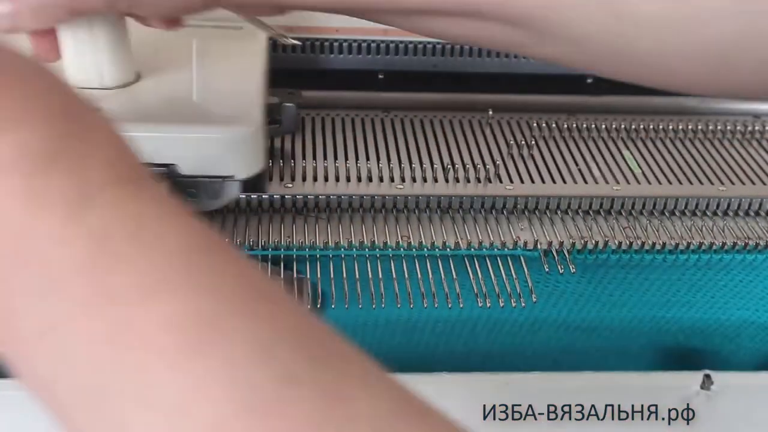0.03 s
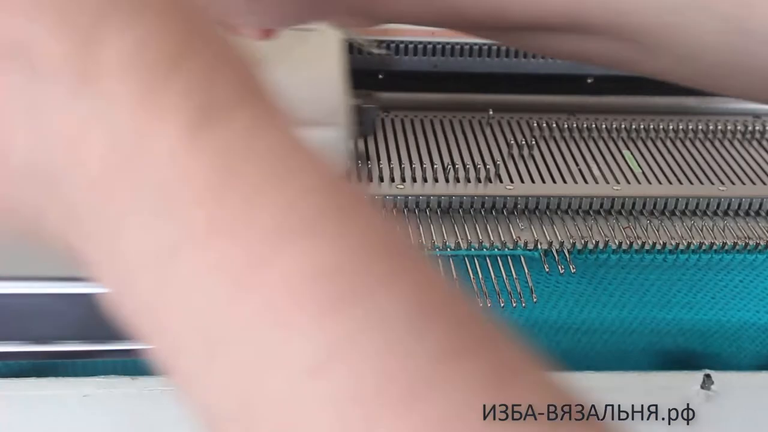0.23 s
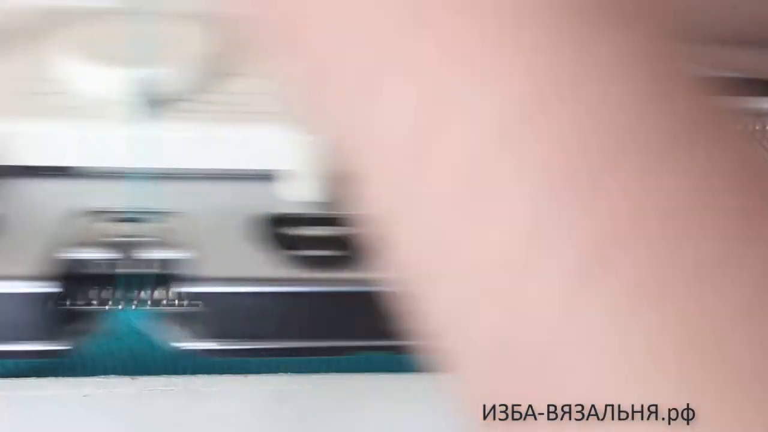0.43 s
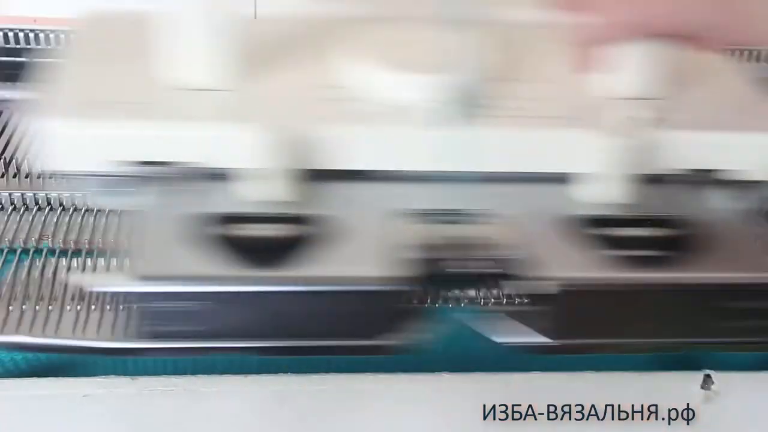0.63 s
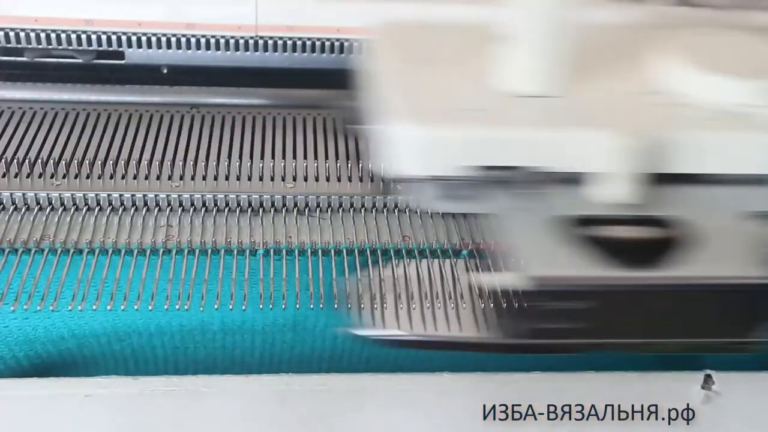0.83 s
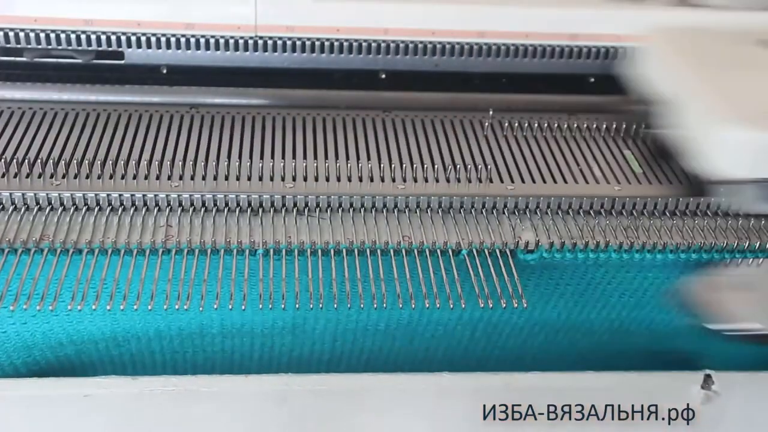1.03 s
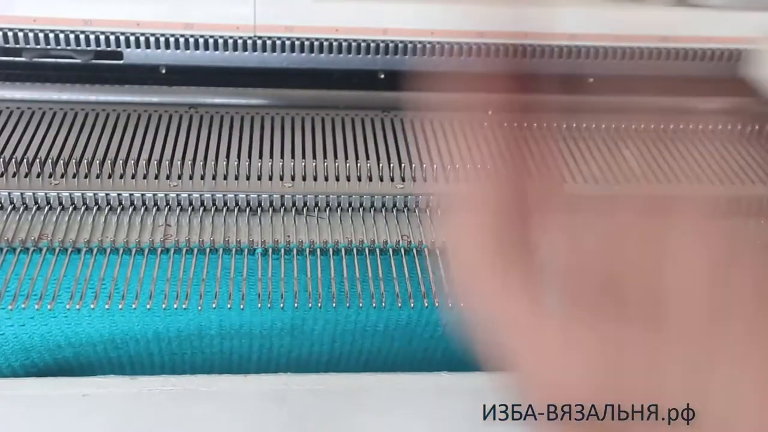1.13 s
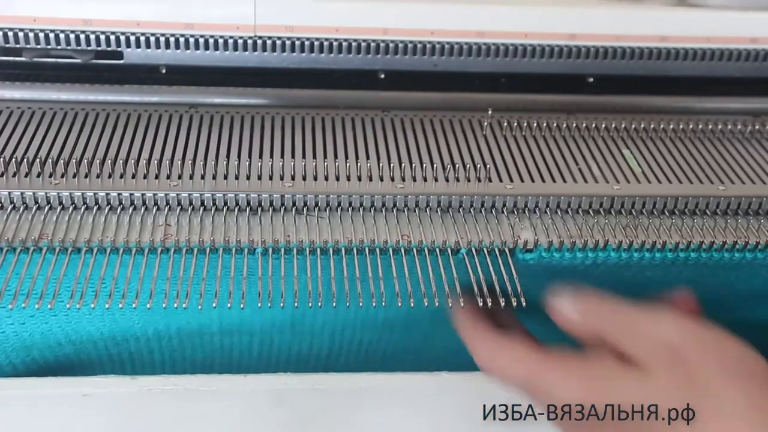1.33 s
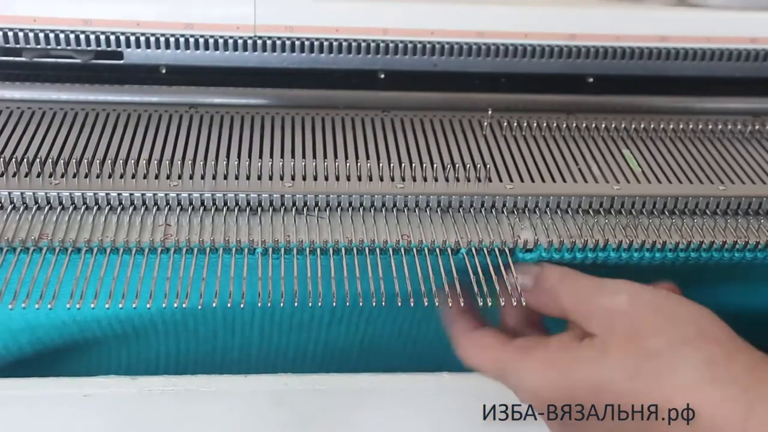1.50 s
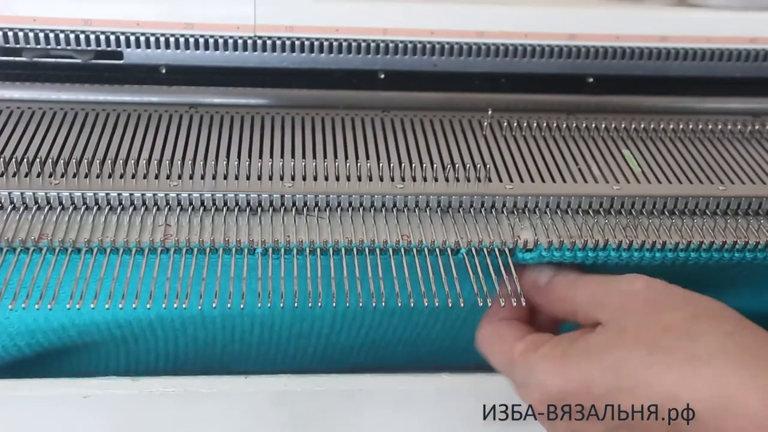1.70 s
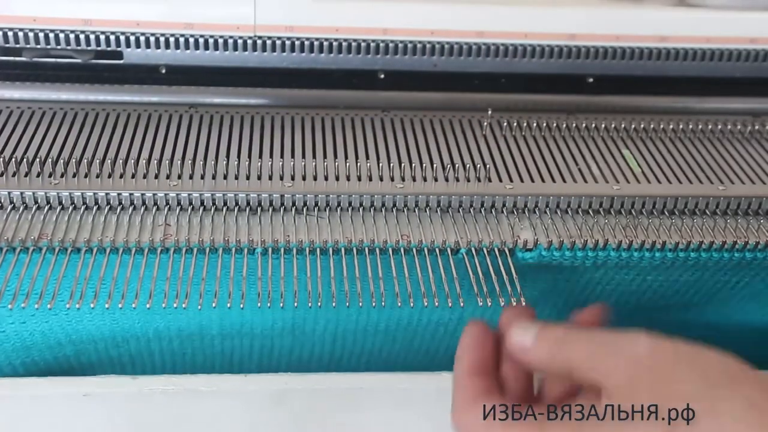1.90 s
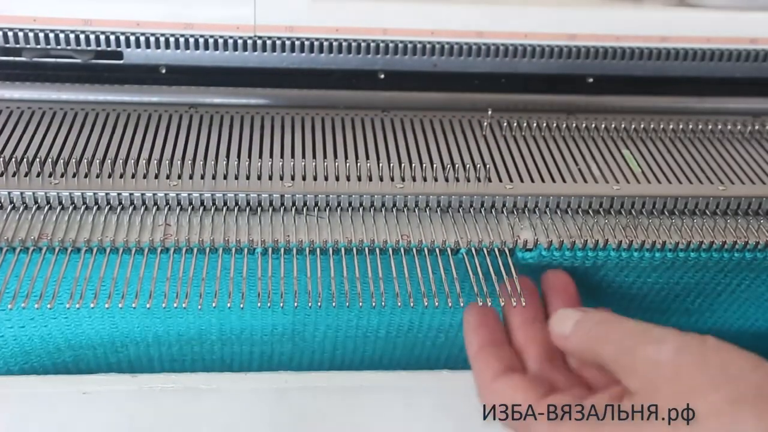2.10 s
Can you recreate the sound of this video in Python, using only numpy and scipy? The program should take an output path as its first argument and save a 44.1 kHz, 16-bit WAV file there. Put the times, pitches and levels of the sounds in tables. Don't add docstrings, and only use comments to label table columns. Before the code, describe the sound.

A knitting machine carriage starts with separate light needle ticks, builds to a loud steel clatter with hard knocks and low thrum, then coasts out with a singing metallic slide; soft fabric tugs follow, close in a quiet room.

```python
import sys
import numpy as np
from scipy import signal
from scipy.fft import rfft, irfft, next_fast_len
from scipy.io import wavfile
from scipy.ndimage import map_coordinates

SR = 44100
rng = np.random.default_rng(int(sys.argv[2]) if len(sys.argv) > 2 else 0)


def makeup_ratio(level_db):
    decades = np.asarray(level_db, float) / 20
    return 10 ** decades


def transcribe(u):
    v = np.clip(np.atleast_2d(u).T, -1, 1)
    q = np.round(v * 32767).astype(np.int16)
    wavfile.write(sys.argv[1], SR, q)


N = 94815


def unit(x):
    return x / np.sqrt(np.mean(x ** 2) + 1e-20)


def along(points, hz):
    f, v = np.transpose(points)
    return np.interp(np.log(hz + 1), np.log(f + 1), v)


def curves(rows):
    s, *columns = np.transpose(rows)
    return [np.interp(np.arange(N) / SR, s, column) for column in columns]


def wobble(rate):
    knots = rng.standard_normal(int(N * rate / SR) + 4)
    return map_coordinates(knots, [np.arange(N) * rate / SR])


def filtered(x, response):
    m = next_fast_len(N + SR // 2)
    return irfft(rfft(x, m) * response(np.fft.rfftfreq(m, 1 / SR)), m)[:N]


def shaped(x, spectrum):
    return unit(filtered(x, lambda hz: makeup_ratio(along(spectrum, hz))))


def ringing(x, peaks):
    def response(f):
        total = 0
        for k, (centre, width, db) in enumerate(peaks):
            damping = 1j * f * width
            total = total + (-1) ** k * makeup_ratio(db) * damping / (centre * centre - f * f + damping)
        return total
    return filtered(x, response)


def rattle(spread_db, rate):
    return unit(rng.standard_normal(N) * makeup_ratio(spread_db * wobble(rate)))


def since(s):
    return np.maximum(np.arange(N) / SR - s, 0)


def swell(s, db, hz, t60, rise):
    t = since(s)
    return makeup_ratio(db + 9 - 60 * t / t60) * (1 - np.exp(-t / rise)) ** 2 * np.sin(2 * np.pi * hz * t)


def room_tone():
    # hz, level_db per Hz
    tone_spectrum = [(12, -35), (20, -14), (106, -5.5), (171, -4), (404, -10.5), (439, -6.5), (549, -16),
                     (3260, -22), (15500, -35)]
    calm_db = -2 * (np.arange(N) / SR - 1.9)
    return makeup_ratio(-62.5 + calm_db + .8 * wobble(8)) * shaped(rattle(.8, 40), tone_spectrum)


def walls(x):
    # hz, t60_s
    decay = [(200, 0.46), (2000, 0.4), (10000, 0.11)]
    hz, t, z = signal.stft(rng.standard_normal(SR // 2), SR, nperseg=256)
    z = z * makeup_ratio(-60 * t / along(decay, hz)[:, None])
    tail = signal.istft(z, SR, nperseg=256)[1]
    delayed = np.pad(x, (300, 0))
    return signal.fftconvolve(delayed, tail / np.linalg.norm(tail))[:N]


def hand():
    # start_s, bump_db, rustle_db
    tugs = [(1.38, -90, -95), (1.43, -64, -67), (1.515, -65, -67), (1.533, -56, -61), (1.553, -53, -68),
            (1.572, -66, -74), (1.62, -66, -78), (1.7, -70, -90), (1.85, -90, -100)]
    # hz, level_db per Hz
    fabric = [(40, -12), (80, -2), (200, 0), (650, -4), (1000, -15), (2500, -19), (6000, -29), (13000, -44)]
    # hz, level_db per Hz
    yarn = [(400, -8), (1200, 0), (2500, 0), (6000, -6), (10000, -13), (15000, -36)]
    bump_db, rustle_db = curves(tugs)
    bumps = makeup_ratio(bump_db) * shaped(rattle(1.5, 70), fabric)
    return bumps + makeup_ratio(rustle_db) * shaped(rattle(1.5, 300), yarn)


def rail():
    # centre_hz, width_hz, level_db
    rail_modes = [(2050, 60, -5), (3570, 90, -7), (3870, 70, -4), (4220, 110, 0), (4480, 120, -3),
                  (4760, 70, -2), (5440, 70, -7), (5940, 90, -4), (6840, 70, -9), (7070, 60, -3)]
    # start_s, level_db
    coast = [(1.06, -110), (1.09, -49), (1.14, -47), (1.16, -46.5), (1.2, -47.5), (1.235, -54), (1.25, -62),
             (1.31, -110)]
    # centre_hz, width_hz, level_db
    runners = [(431, 70, -1), (510, 50, -4), (595, 45, 0), (720, 70, -5)]
    # start_s, level_db
    groan_level = [(1.1, -90), (1.125, -51), (1.15, -54), (1.168, -43), (1.222, -45), (1.235, -54),
                   (1.25, -49), (1.292, -52), (1.305, -62), (1.36, -85)]
    # centre_hz, width_hz, level_db
    tip_modes = [(7070, 70, 0), (6840, 70, -6)]
    # start_s, level_db
    tip_level = [
        (1.07, -110),
        (1.095, -55),
        (1.14, -56),
        (1.18, -66),
        (1.22, -110),
    ]
    # start_s, level_db
    brake = [
        (1.24, -110),
        (1.3, -53.5),
        (1.365, -60.5),
        (1.385, -67),
        (1.43, -110),
    ]
    # hz, level_db per Hz
    brush = [(900, -17), (1800, -2.5), (2500, -2), (3100, -4), (3600, -16), (5000, -13), (8000, -40)]
    rung = ringing(rattle(1.1, 250), rail_modes)
    song = makeup_ratio(curves(coast)[0]) * unit(ringing(rung, [(3820, 3200, 0)]))
    groan = makeup_ratio(curves(groan_level)[0]) * unit(ringing(rattle(3.5, 90), runners))
    tip = makeup_ratio(curves(tip_level)[0]) * unit(ringing(rattle(1.3, 230), tip_modes))
    drag = makeup_ratio(curves(brake)[0]) * shaped(rattle(1.5, 200), brush)
    return song + groan + tip + drag


def boom():
    # start_s, level_db
    jolts = [(.285, -43), (.41, -39), (.47, -45), (.53, -45), (.59, -44), (.63, -41), (.728, -35),
             (.758, -31), (.82, -35), (.89, -35), (.915, -34), (.945, -36), (1.03, -32), (1.055, -37),
             (1.175, -45), (1.33, -54), (1.35, -57), (1.527, -54), (1.595, -57)]
    boom_hz, t60_s, rise_s = 136, .16, .016
    out = 0
    for s, db in jolts:
        in_step = np.round(s * boom_hz) / boom_hz
        out = out + swell(in_step, db, boom_hz, t60_s, rise_s)
    return out


def knocks():
    # start_s, dull_db, bright_db, length_s
    contacts = [(0.0444, -52.5, -43, 0.017), (0.411, -36, -55, 0.0057), (0.425, -32, -42, 0.012),
                (0.459, -55, -29.5, 0.0069), (0.469, -29, -26, .011), (0.715, -36, -35, 0.018),
                (0.731, -29, -31.5, 0.028), (0.766, -26, -41, 0.0041), (.772, -37, -22.5, .0035),
                (1.043, -30.5, -28, 0.0082), (1.121, -36, -38, 0.0092), (1.526, -55.5, -69, 0.02),
                (1.62, -71, -78, 0.013)]
    # start_s, level_db, pitch_hz, t60_s
    shell_rings = [(.412, -36, 450, .04), (.423, -26, 480, .04), (.423, -24, 730, .04),
                   (.423, -24, 1000, .04), (.425, -33, 1800, .04), (.472, -28, 560, .035),
                   (.475, -29, 1100, .03), (.472, -31, 1420, .03), (.468, -34, 372, .1),
                   (.703, -35, 640, .15), (.722, -33, 630, .08), (.735, -28, 705, .06),
                   (.761, -30, 650, .04), (1.545, -58, 590, .08), (1.612, -65, 1010, .1)]
    # hz, level_db per Hz
    dull_spectrum = [(60, -30), (200, -9), (450, -1), (1000, 0), (2000, -4), (4000, -20)]
    # hz, level_db per Hz
    bright_spectrum = [(500, -4), (1500, -8), (3500, 8.5), (7000, 4), (10000, -3), (15500, -22)]
    dull = shaped(rattle(2, 400), dull_spectrum)
    bright = shaped(rattle(2, 1200), bright_spectrum)
    out = sum(swell(s, db, hz, t60, .004) for s, db, hz, t60 in shell_rings)
    for s, dull_db, bright_db, length in contacts:
        t = since(s)
        shape = (1 - np.exp(-t / 0.0012)) * np.exp(-(t / length) ** 2)
        out = out + shape * (makeup_ratio(dull_db) * dull + makeup_ratio(bright_db) * bright)
    return out


def thrum():
    # start_s, rate_hz (needles a second), level_db
    push = [(.55, 130, -90), (.63, 148, -50), (.648, 153, -37), (.68, 154, -39), (.71, 152, -46),
            (.73, 126, -43), (.745, 126, -34.5), (.862, 126.6, -34.5), (.88, 127.4, -47),
            (1.03, 124.7, -50), (1.08, 123, -100)]
    orders = [(1, -15), (2, -8), (3, 0), (4, -16)]
    rate, level_db = curves(push)
    phase = 2 * np.pi * np.cumsum(rate * (1 + .003 * wobble(30))) / SR
    return makeup_ratio(level_db) * sum(makeup_ratio(db + wobble(20)) * np.sin(k * phase + k) for k, db in orders)


def needles():
    # start_s, clatter_db, cam_load_db over the clatter, shake_db of the table over it
    stroke = [(0, -57, -2, 0), (.02, -51.5, 0, -9), (.12, -44.5, -2.5, -6.5), (.27, -40, -3, -8),
              (.4, -32, -5, -8), (.43, -29.5, -1, -6), (.52, -29.5, -3, -10), (.64, -28, -2.5, -10.5),
              (.715, -25.5, -4, -14), (.75, -30, -1.5, -8.5), (.97, -32.5, -1.5, -8.5),
              (1.02, -38, 1, -0.5), (1.06, -44.5, 5.5, 5), (1.1, -49.5, 1, 1.5), (1.14, -53.5, 7.5, 2),
              (1.19, -60.5, 12, 14.5), (1.29, -66, 7, 10.5), (1.4, -87.5, 14, 18.5)]
    # start_s, level_db over the clatter
    tick_events = [(.005, 2), (.018, 3), (.033, -3), (.0465, 4), (.052, 1), (.0655, -2), (.0827, 1),
                   (.1037, 5), (.109, -3), (.128, 2), (.1486, 1), (.153, -2), (.1745, 2), (.1935, 0),
                   (.215, 1), (.2315, -3), (.2505, 0), (.257, -3), (.2845, -1), (.2935, -1), (.309, -2),
                   (.332, -4), (.364, -3)]
    # start_s, level_db
    between = [(.03, -8), (.07, -5), (.28, 0)]
    # hz, level_db
    tick_tilt = [(4000, -1), (9000, 1), (14000, 5)]
    # hz, level_db per Hz
    butts = [(1470, -19), (2500, 5), (3170, 0), (6160, 6), (7350, 1), (8760, 2), (10100, -1), (12900, -16),
             (15600, -45)]
    # centre_hz, width_hz, level_db
    latches = [(4710, 900, -1.5), (5580, 620, -0.5), (6720, 1020, -1), (8410, 850, 3), (9080, 1180, 0),
               (11230, 1270, -5), (13000, 1060, -7)]
    # hz, level_db per Hz
    cam_spectrum = [(400, -18.5), (900, -1), (1300, 1), (2000, -5), (2900, -1), (4000, -1), (5500, -7),
                    (9000, -19)]
    # centre_hz, width_hz, level_db
    free_plates = [(388, 9.8, -6), (1805, 120, -5.5)]
    # centre_hz, width_hz, level_db
    loaded_plates = [(2065, 230, 3.5), (2825, 600, 0), (3460, 190, -6.5), (3990, 97, -14)]
    # centre_hz, width_hz, level_db
    table_modes = [(136.8, 9.5, 0), (273.6, 51, -6), (384, 88, -4.5), (472.5, 48, -2), (553, 99, -2.5),
                   (792, 380, -7)]
    # hz, level_db per Hz
    deep = [(20, -28), (40, -18), (70, -6), (100, 0), (130, -2), (200, -12)]
    level_db, load_db, shake_db = curves(stroke)
    seconds = np.arange(N) / SR
    load = np.interp(seconds, (0.44, 0.684), (0, 1))
    far = np.interp(seconds, (1, 1.31), (0, 1))

    ticks = 0
    for s, db in tick_events:
        t = since(s)
        body = makeup_ratio(db - 60 * t / .038)
        snap = makeup_ratio(db + 3 - 60 * t / .007)
        ticks = ticks + (1 - np.exp(-t / .0007)) * (body + snap)

    plain = shaped(rattle(1.3, 900), butts)
    steel = unit(plain + makeup_ratio(-0.5) * unit(ringing(rattle(1.6, 700), latches)))
    notched = filtered(steel, lambda hz: makeup_ratio(-6 * np.exp(-((hz - 7400) / 330) ** 2)))
    steel = notched * (1 - load) + steel * load
    distant = filtered(steel, lambda hz: 1 / (1 + (hz / 9500) ** 4))
    steel = steel * (1 - far) + far * distant
    clatter = steel * makeup_ratio(curves(between)[0] + wobble(44.77))
    high = makeup_ratio(level_db) * (clatter + shaped(steel, tick_tilt) * ticks)

    free = unit(ringing(rattle(0.82, 400), free_plates))
    loaded = unit(ringing(rattle(0.86, 400), loaded_plates))
    plates = np.sqrt(1 - load) * free + np.sqrt(load) * loaded
    cams = unit(shaped(rattle(1.2, 500), cam_spectrum) + makeup_ratio(-5.5) * plates)
    cams = cams * makeup_ratio(level_db + load_db + 1.26 * wobble(34.82))

    table = unit(ringing(rattle(1.2, 150), table_modes)) + makeup_ratio(-15) * shaped(rattle(1.5, 15), deep)
    return high + cams + table * makeup_ratio(level_db + shake_db)


def scene():
    ends = makeup_ratio(curves([(1.42, 0), (1.6, -40)])[0])
    machine = needles() * ends + knocks() + rail() + hand()
    reverberation = makeup_ratio(-12) * walls(machine)
    return (machine + thrum() + boom() + reverberation + room_tone())[None]


def band_limit(x):
    return signal.sosfilt(signal.butter(12, 15700, fs=SR, output="sos"), x)


def record(dry):
    wide = filtered(dry[0], lambda hz: hz < 15720)
    narrow = filtered(dry[0], lambda hz: hz < 15120)
    quiet = np.clip((np.arange(N) / SR - 1.195) / .02, 0, 1)
    return band_limit((wide + quiet * (narrow - wide))[None])


dry = scene()
out = record(dry)
transcribe(out)
```